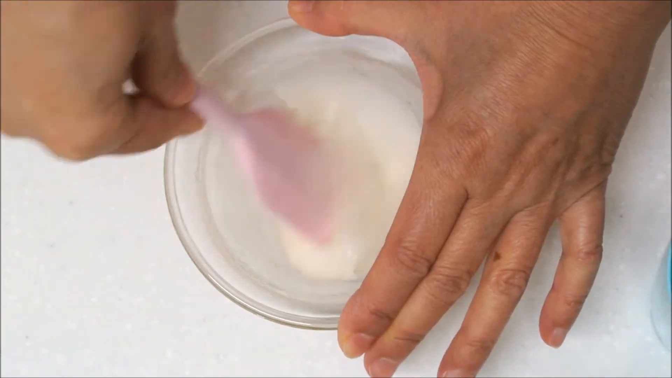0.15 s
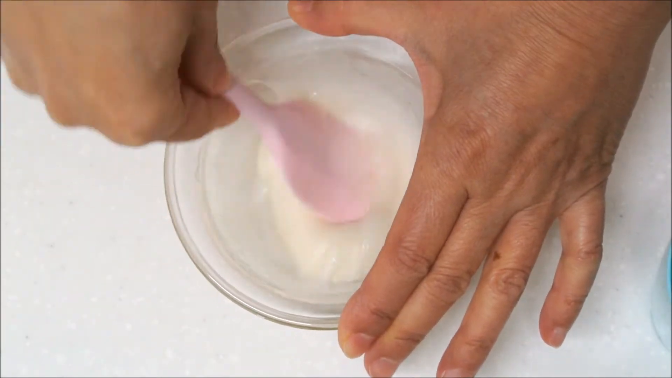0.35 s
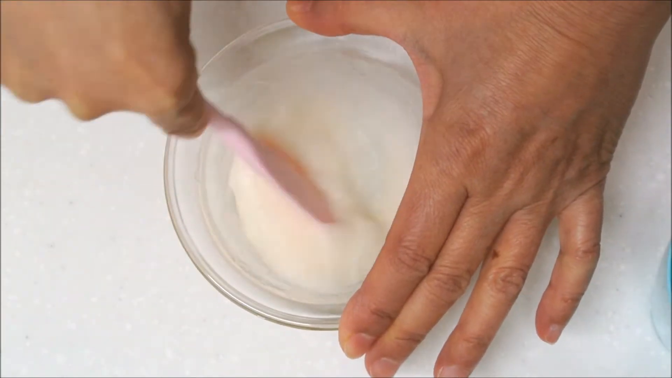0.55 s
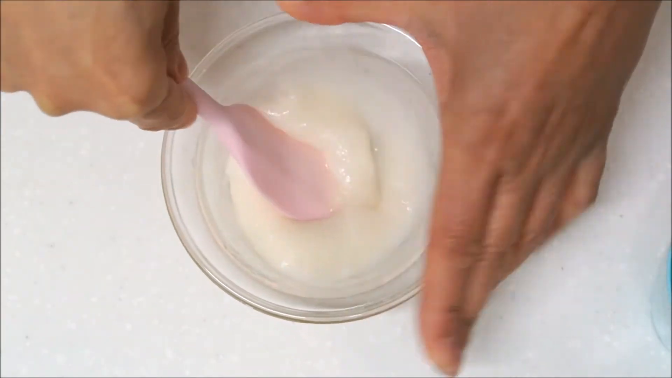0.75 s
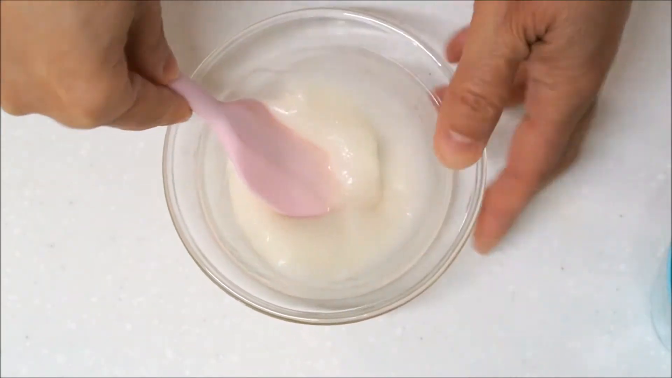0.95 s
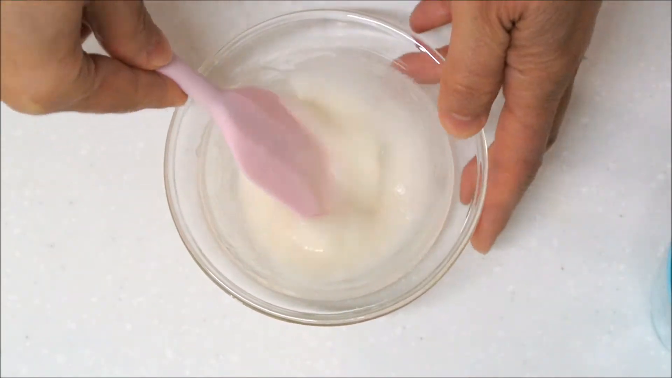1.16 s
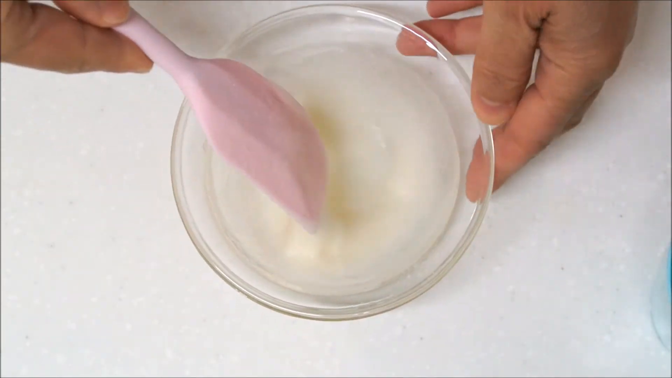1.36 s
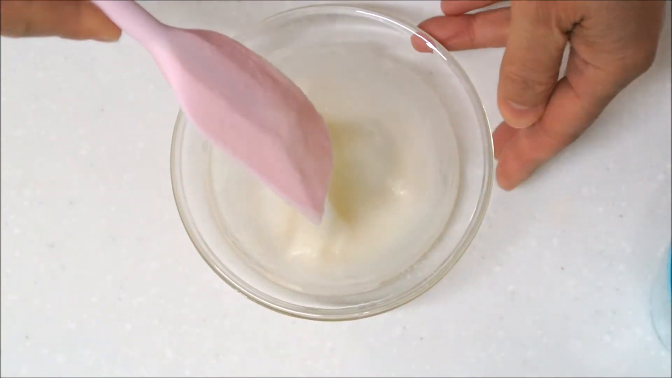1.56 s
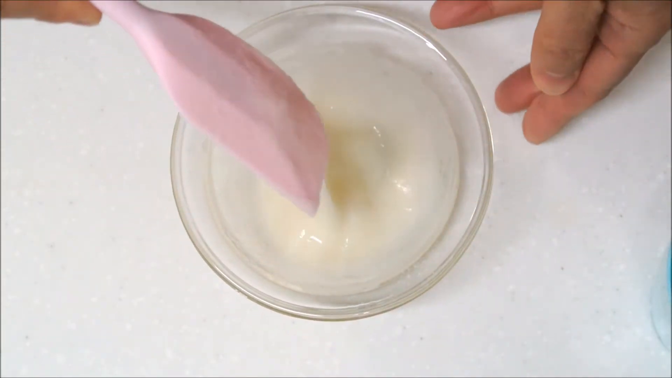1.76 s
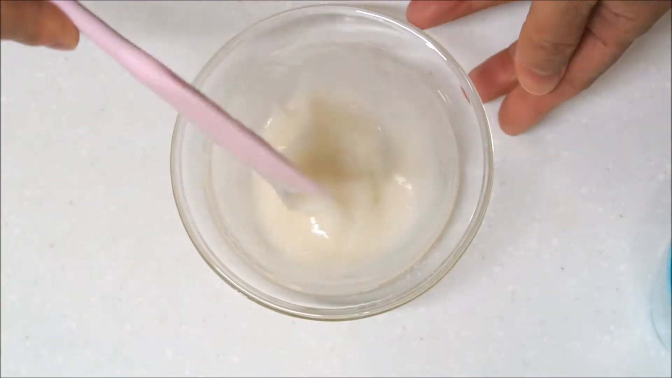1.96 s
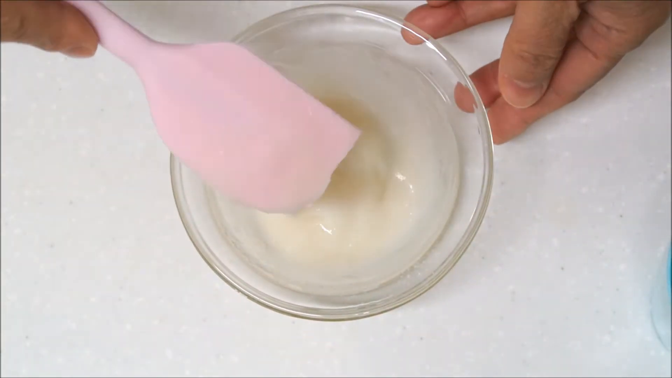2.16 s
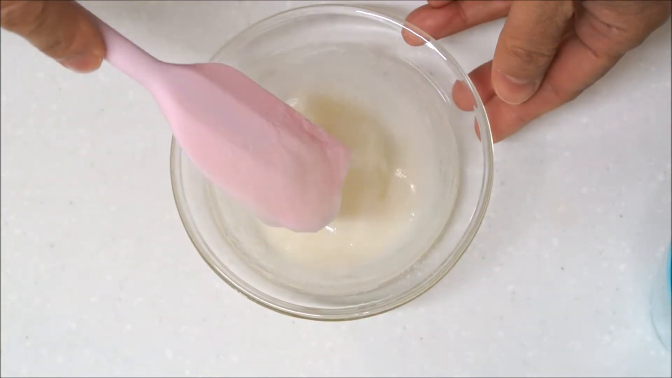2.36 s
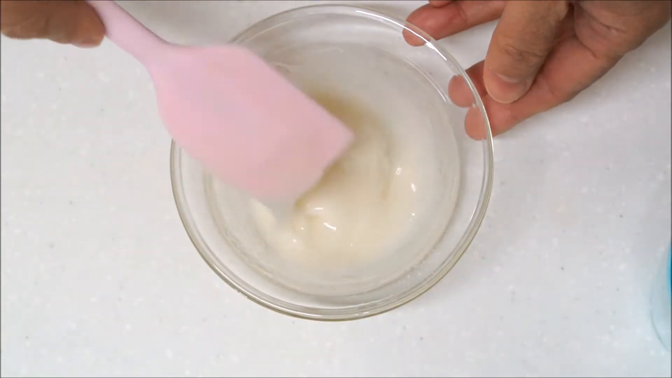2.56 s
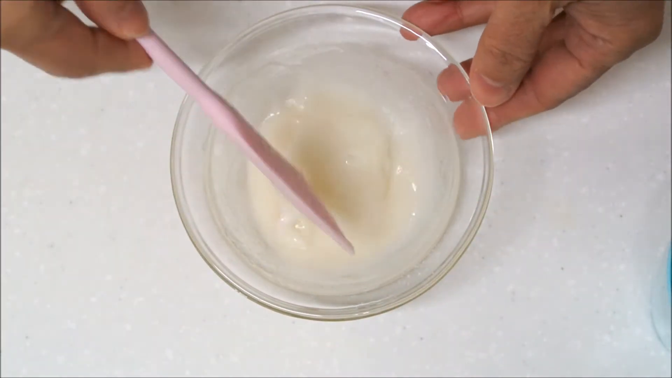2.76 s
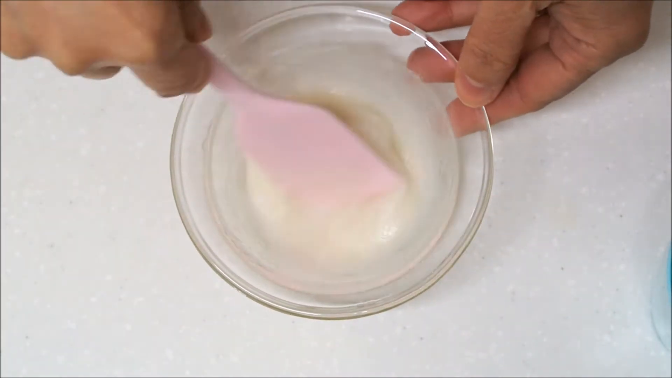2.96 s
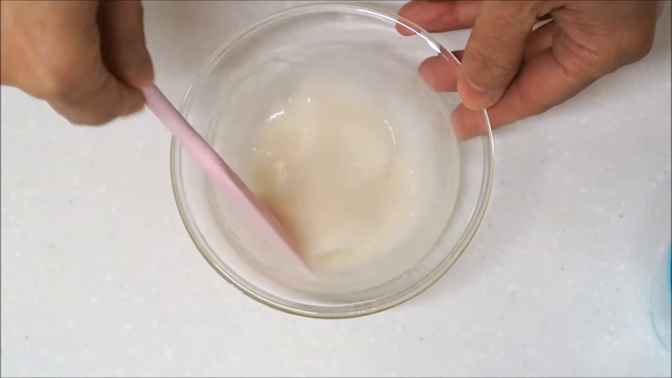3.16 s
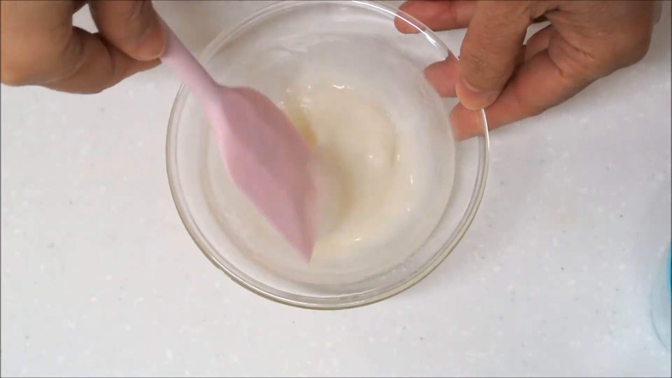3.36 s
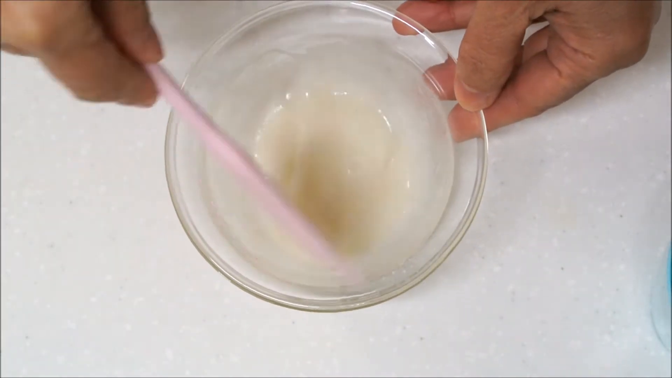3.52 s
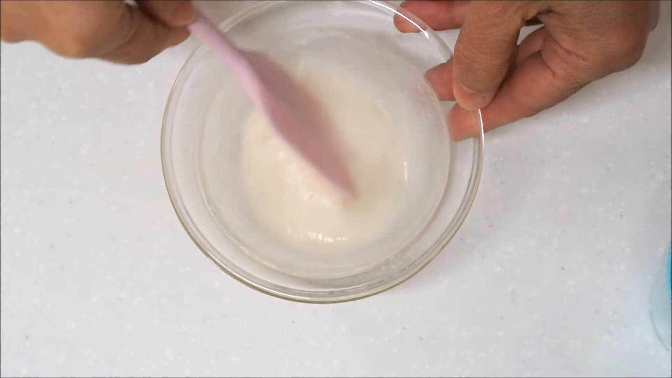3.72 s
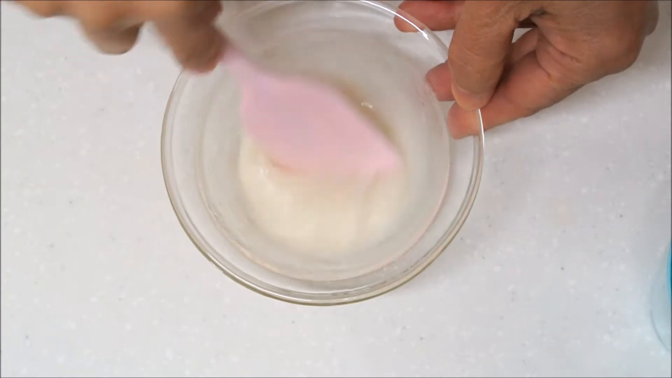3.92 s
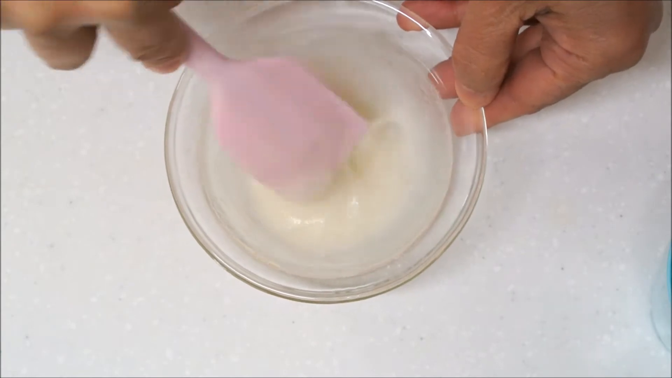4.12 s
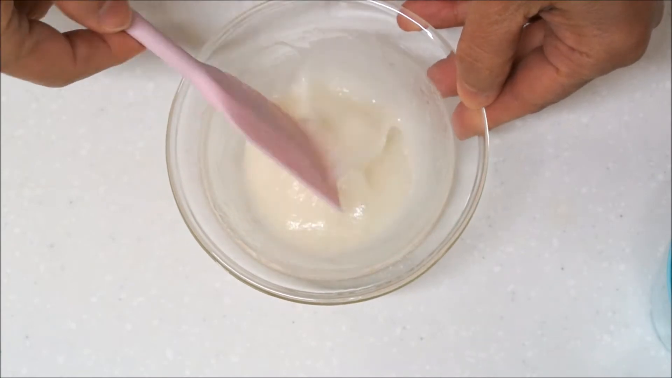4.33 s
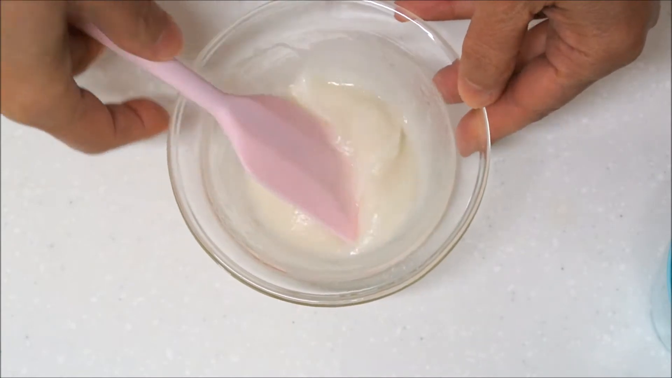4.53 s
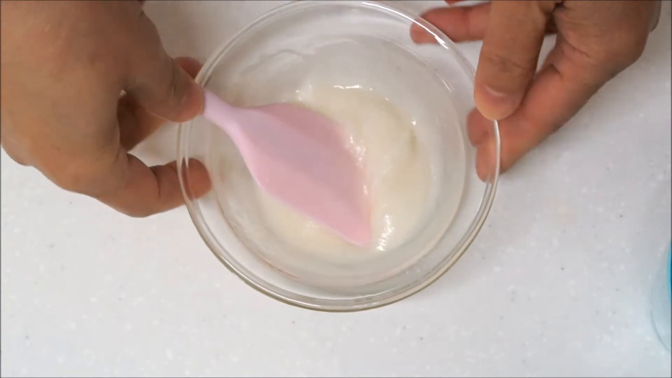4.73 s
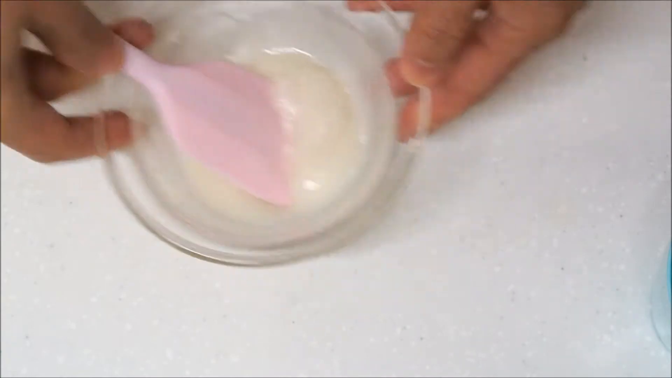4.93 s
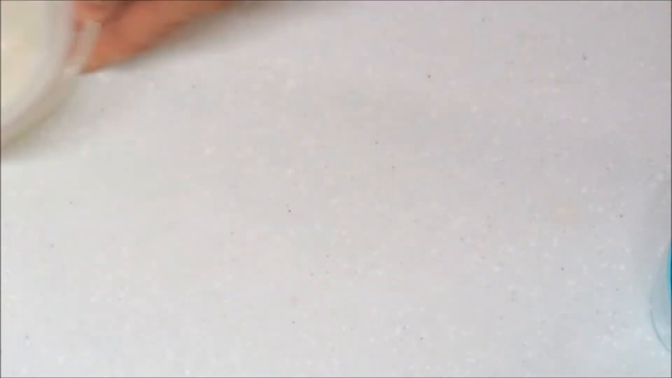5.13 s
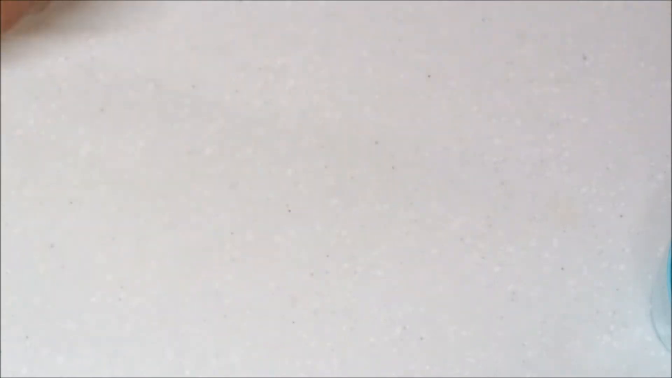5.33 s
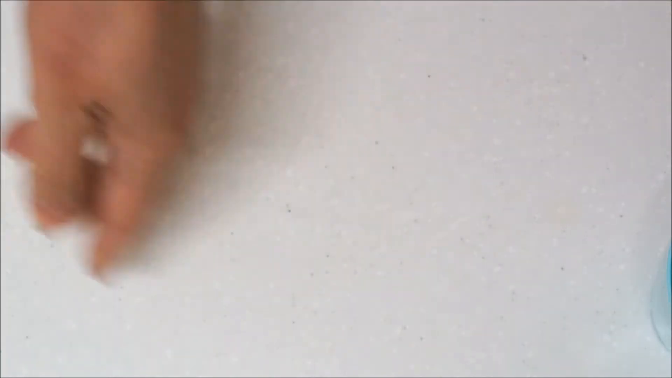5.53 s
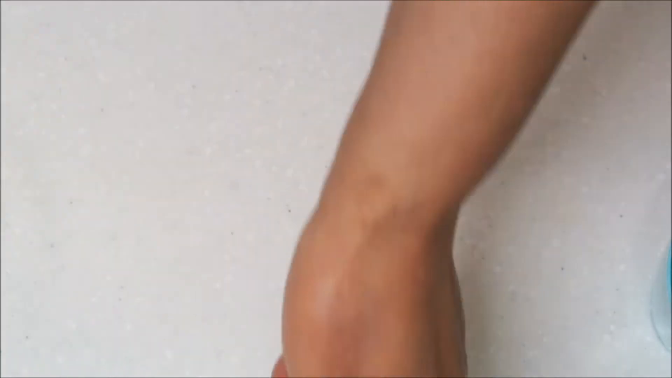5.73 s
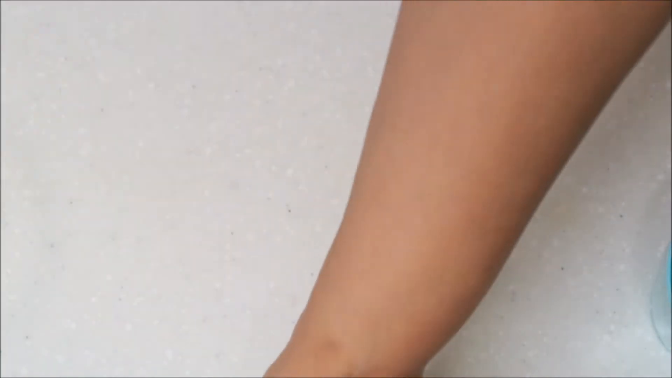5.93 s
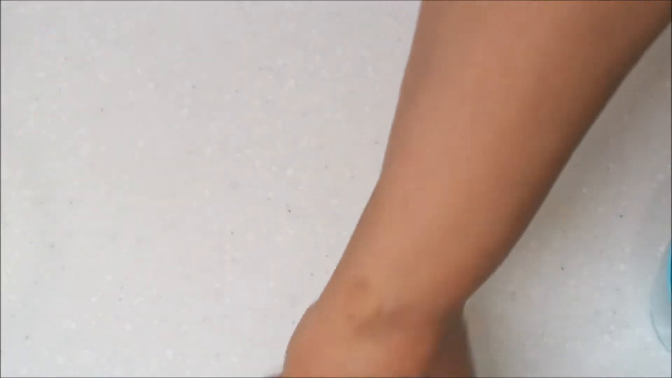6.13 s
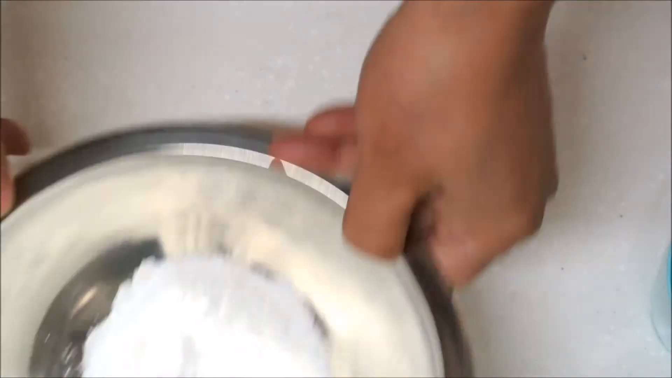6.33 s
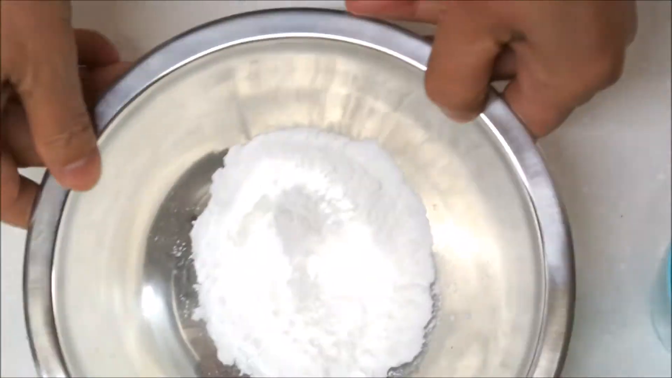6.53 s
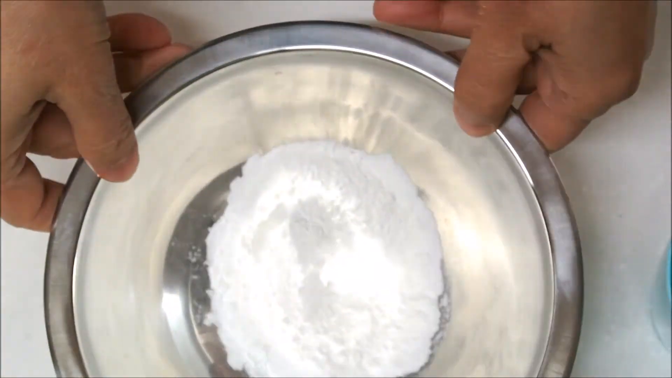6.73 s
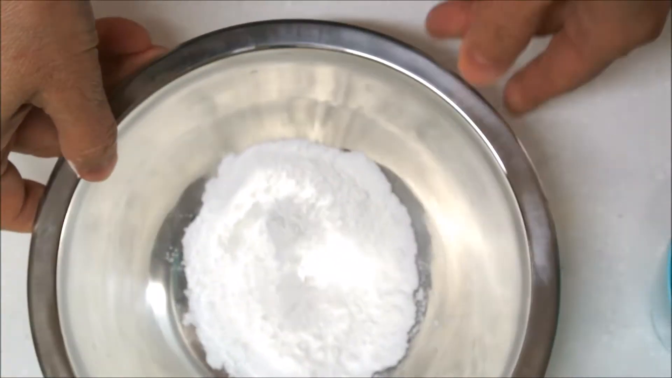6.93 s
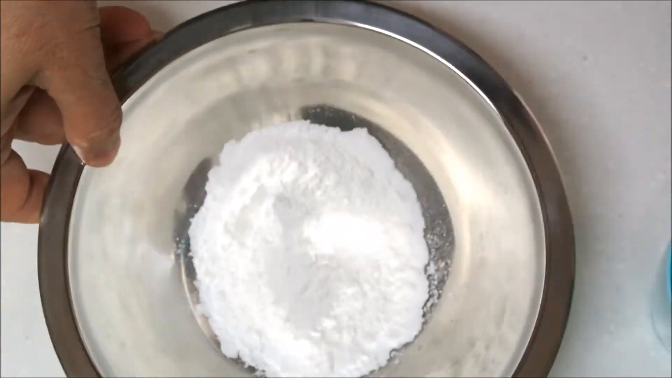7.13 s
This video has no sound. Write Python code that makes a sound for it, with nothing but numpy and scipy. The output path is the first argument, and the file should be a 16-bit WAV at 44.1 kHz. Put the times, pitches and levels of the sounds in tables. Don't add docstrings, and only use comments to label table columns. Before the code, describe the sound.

A close stereo pickup in a hard, echoing kitchen, with steady low fridge hum, soft hiss and thin rustling of hands throughout. From 0.4 to 0.75 s a soft blade wipes sticky paste in a glass bowl: bright crackling swipes, wet ticks, peels and a tiny glass ting. Dull bowl taps follow at 0.9 to 1.2 s, then it is mostly quiet, with faint ticks and a slight shift near 2.3 s. A small wet smack comes at 3.24 s, a clean damped double knock at 3.7 s, and soft bumps at 4.4 to 4.8 s. Glass grinds on stone from 5.0 s and lands at 5.27 s with by far the loudest crack, overloaded, room ringing, level briefly ducking. A light tap at 5.6 s; steel touches at 6.06 s, jerks harshly at 6.12 and 6.38 s with squeaks and rim ring, then clanks down at 6.94 s, bouncing.

```python
import sys
import numpy as np
from scipy import signal
from scipy.io import wavfile
from scipy.ndimage import uniform_filter1d, minimum_filter1d

SR = 44100
rng = np.random.default_rng(int(sys.argv[2]) if len(sys.argv) > 2 else 0)


def natural_amplitude(level_db):
    exponent = np.asarray(level_db, float) / 20
    return 10 ** exponent


def bounce(signal):
    frames = np.transpose(np.atleast_2d(signal))
    limited = np.clip(frames, -1, 1)
    pcm = np.round(limited * 32767).astype(np.int16)
    wavfile.write(sys.argv[1], SR, pcm)


N = 316638
PORT_LEAN = 10 ** (np.array([[-1.2], [1.2]]) / 20)


def in_time(rows):
    s, *columns = np.transpose(rows)
    return [np.interp(np.arange(N) / SR, s, c, left=-120, right=-120) for c in columns]


def at_hz(points, hz):
    table_hz, values = np.array(points).T
    return np.interp(np.log(hz), np.log(table_hz), values)


def rms_one(x):
    return x / np.sqrt(np.mean(x ** 2) + 1e-20)


def resonate(x, hz, width_hz):
    r = np.exp(-np.pi * width_hz / SR)
    gain = (1 - r * r) / 2
    return signal.lfilter([gain, 0, -gain], [1, -2 * r * np.cos(2 * np.pi * hz / SR), r * r], x)


def resonate_twice(x, hz, width_hz):
    return resonate(resonate(x, hz, width_hz), hz, width_hz)


# pitch_hz, likeness (-1 to 1)
LIKENESS = [(60, 0.57), (150, 0.87), (380, 0.85), (950, 0.59), (2380, 0.12), (5980, -0.091),
            (15000, -0.016)]
# pitch_hz, left_minus_right_db
LEAN = [(60, 1), (180, -2), (550, -2), (1650, -1.5), (4970, 0.5), (15000, -0.5)]


def stereo(pair, hz):
    alike = np.clip(at_hz(LIKENESS, hz), -1, 1)
    sides = np.array([[1], [-1]])
    mixed = np.sqrt(1 + alike) * pair[0] + np.sqrt(1 - alike) * pair[1] * sides
    return mixed * natural_amplitude(at_hz(LEAN, hz) / 2 * sides)


def bands(size):
    white = rng.standard_normal((2, 2, size))
    edges = 25 * 2 ** (np.arange(29) / 3)
    for k, (low, high) in enumerate(zip(edges, edges[1:])):
        hz = np.sqrt(low * high)
        band_pass = signal.butter(2, [low, high], "band", fs=SR, output="sos")
        yield hz, stereo(signal.sosfilt(band_pass, white[k % 2]), hz)


def grains(per_s, spread_db):
    sizes = natural_amplitude(spread_db * np.minimum(rng.exponential(1, N), 5)) * rng.choice([-1, 1], N)
    slips = rms_one(sizes * (rng.random(N) < per_s / SR))
    return slips + 0.99 * rng.standard_normal((2, N))


def body(drive, peaks):
    return rms_one(sum((-1) ** k * natural_amplitude(db) * resonate(drive, hz, width_hz)
                       for k, (hz, width_hz, db) in enumerate(peaks)))


def strokes(rows, rise_db_s, sag_db_s, fall_db_s):
    s, held, *columns = np.transpose(rows)
    since = np.arange(0, N, 16) / SR - s[:, None]
    released = np.maximum(since - held[:, None], 0)
    loss_db = np.where(since < 0, rise_db_s * since, -sag_db_s * since - fall_db_s * released)
    lead = np.argmax(columns[0][:, None] + loss_db, axis=0)
    lead_loss_db = loss_db[lead, np.arange(len(lead))]
    return np.repeat([lead_loss_db] + [c[lead] for c in columns], 16, axis=1)[:, :N]


def add(out, s, piece):
    at = round(s * SR)
    out[..., at:at + piece.shape[-1]] += piece[..., :N - at]


def puff(noise, hz, width_hz, t60):
    dying = noise * natural_amplitude(-60 * np.arange(noise.shape[-1]) / SR / t60)
    sound = resonate_twice(dying, hz, width_hz)
    return sound / np.max(np.abs(sound))


def puffs(rows, width_share):
    out = np.zeros((2, N))
    for s, db, hz, t60 in rows:
        add(out, s, natural_amplitude(db) * puff(rng.standard_normal((2, SR // 5)), hz, width_share * hz, t60))
    return out


# pitch_hz, level_db per Hz
ROOM_TONE = [(15, -48), (25, -28), (38, -11.5), (70, -14.5), (149, -12), (206, -13), (249, -6.5),
             (344, -10), (384, -6.5), (476, -9.5), (796, -11.5), (1480, -17.5), (3620, -22), (11300, -26),
             (16000, -28.5)]
# pitch_hz, width_hz, level_db rms
HUM = [(71.6, 2.7, -77), (104, 6.1, -76), (144.5, 4.3, -66.5), (247.2, 20, -57.5), (290.3, 11.4, -62.5),
       (393.2, 23, -63), (500, 5.4, -65.5), (793.4, 43, -62), (873.4, 19, -62.5)]
ROOM_TONE_DB, MOTOR_HZ, MOTOR_DB = -47, 48.7, -65


def room_tone():
    wash = rms_one(sum(natural_amplitude(at_hz(ROOM_TONE, hz)) * band for hz, band in bands(N)))
    motor = np.sqrt(2) * np.sin(2 * np.pi * MOTOR_HZ * np.arange(N) / SR)
    out = natural_amplitude(ROOM_TONE_DB - 1.44) * wash + natural_amplitude(MOTOR_DB) * motor
    for hz, width_hz, db in HUM:
        line = resonate_twice(rng.standard_normal((2, N + SR)), hz, width_hz)[:, SR:]
        out = out + natural_amplitude(db) * rms_one(stereo(line, hz))
    return out


# time_s, level_db
WHISPER = [(0.0, -51.5), (0.6, -54), (1.37, -51.5), (2.27, -57.5), (2.88, -53), (3.1, -59), (3.68, -58),
           (3.87, -54), (4.25, -53.5), (5.25, -52.5), (5.9, -49.5), (6.33, -47.5), (6.74, -51), (7.18, -49)]
WHISPER_FLICKER_DB, FLICKER_S = 4.0, .03


def whisper():
    slow = uniform_filter1d(rng.standard_normal(N), round(FLICKER_S * SR))
    flicker = rms_one(uniform_filter1d(slow, size=600))
    level_db = in_time(WHISPER)[0] - 5.0 + WHISPER_FLICKER_DB * np.tanh(flicker)
    return natural_amplitude(level_db) * body(rng.standard_normal((2, N)), [(9000, 17000, 0)])


# start_s, peak_db, pitch_hz, t60_s
PEELS = [(.13, -42, 1500, .15), (.135, -42, 4500, 0.14), (.364, -40, 7500, .08), (.384, -27, 13500, .01),
         (.416, -38, 13000, .03), (0.401, -30.5, 4000, 0.2), (0.628, -24.5, 7500, 0.057),
         (.646, -24, 7600, 0.059), (.646, -30, 10500, .05), (3.234, -34, 9000, 0.065),
         (3.238, -30, 13100, .03), (3.236, -51, 3440, .12), (3.7129, -29, 10000, 0.029),
         (3.996, -38, 4970, .012), (5.611, -29.5, 4100, 0.014), (5.678, -41, 4700, .02),
         (6.064, -37, 178, 0.38), (6.9353, -14, 9900, 0.026), (6.9352, -23, 6040, 0.034),
         (6.963, -26, 2700, 0.023), (6.963, -27, 10000, 0.082)]


def peels():
    return puffs(PEELS, width_share=0.39)


# start_s, peak_db, pitch_hz
THUDS = [(0.143, -52, 139), (0.388, -44.5, 99), (0.66, -49, 136), (1.032, -65, 72.7), (3.237, -49, 72.7),
         (3.711, -42, 74), (4.406, -48.5, 87.5), (4.773, -58, 108), (5.273, -41, 142), (6.063, -51, 102),
         (6.117, -47, 106), (6.935, -38, 99)]
THUD_T60_S = .12


def thuds():
    out, t = np.zeros((2, N)), np.arange(SR // 3) / SR
    fade = natural_amplitude(-60 * t / THUD_T60_S)
    for s, db, hz in THUDS:
        boom = np.sin(2 * np.pi * hz * t) + np.sin(2 * np.pi * 2.13 * hz * t) * fade
        add(out, s, natural_amplitude(db + 4.0) * fade * (1 - np.exp(-t / 0.00079)) * boom)
    return out * PORT_LEAN


# start_s, peak_db, pitch_hz, edge_db
BUMPS = [(0.387, -31.5, 1700, -51), (0.625, -31.5, 1420, -52), (0.918, -32, 800, -46),
         (1.093, -37, 850, -44), (1.194, -34, 805, -42), (3.236, -42, 503, -47), (4.407, -46, 1190, -53),
         (4.636, -33.5, 744, -37.5), (4.736, -34.5, 760, -46), (4.773, -29.5, 780, -36),
         (4.799, -33.5, 730, -56), (5.609, -33, 870, -44.5), (6.063, -36, 380, -44),
         (6.377, -32.5, 1100, -55)]
BUMP_T60_S, BUMP_WIDTH_SHARE = .065, 0.75
EDGE_HZ, EDGE_WIDTH_HZ, EDGE_T60_S = 1370, 700, .07


def bumps():
    out = np.zeros((2, N))
    for s, db, hz, edge_db in BUMPS:
        shared, own = rng.standard_normal(SR // 5), rng.standard_normal((2, SR // 5))
        shared[0] = 1.4
        edge = puff(shared + .5 * own, EDGE_HZ, EDGE_WIDTH_HZ, EDGE_T60_S)
        tap = puff(shared + 0.22 * own, hz, BUMP_WIDTH_SHARE * hz, BUMP_T60_S)
        add(out, s, natural_amplitude(db - 3.5) * tap + natural_amplitude(edge_db) * edge)
    return out * PORT_LEAN


# start_s, peak_db, pitch_hz, t60_s
KNOCKS = [(.388, -39, 3600, .015), (.388, -41, 1700, .02), (.5105, -36, 4000, .01), (.921, -41, 1500, .02),
          (.924, -37, 905, 0.046), (1.0925, -32, 1450, .025), (1.093, -39, 2500, .015),
          (1.094, -34, 880, .07), (1.195, -32, 850, .07), (1.196, -39, 1700, .05), (1.203, -40, 1250, .06),
          (3.715, -36, 2750, .02), (3.715, -39, 3650, .015), (3.716, -33, 780, .06),
          (6.059, -44, 3950, .07), (6.0642, -23, 600, .02), (6.068, -28.5, 239, 0.054),
          (6.0764, -27, 420, .022), (6.0875, -36, 2100, .015), (6.0875, -38, 3670, .012),
          (6.1, -42, 2100, .01), (6.378, -38, 1247, .06), (6.113, -40, 1150, .05), (6.122, -39, 1500, .07),
          (6.137, -37, 1500, 0.065), (6.128, -40, 3700, .015), (6.145, -41, 3900, .015)]


def knocks():
    out, t = np.zeros((2, N)), np.arange(SR // 3) / SR
    for s, db, hz, t60 in KNOCKS:
        add(out, s, natural_amplitude(db - 60 * t / t60) * (1 - np.exp(-t / 0.00045)) * np.sin(2 * np.pi * hz * t))
    return out * PORT_LEAN


# full_pressure_s, held_s, level_db, film_pitch_hz
WIPES = [(.388, 0.005, -39, 5500), (.397, .008, -42, 5500), (.412, .02, -40, 4200), (.436, .02, -46, 3800),
         (.46, .045, -50, 5000), (.511, .004, -47, 7500), (.63, .015, -37, 7400), (.646, 0.022, -36, 8200),
         (.712, 0.0054, -45, 7900), (.73, 0.036, -49, 6500), (3.255, .025, -49, 9800),
         (3.29, 0.046, -52, 6700)]


def wipes():
    drive = grains(per_s=8000, spread_db=5.5)
    loss_db, db, pitch_hz = strokes(WIPES, rise_db_s=1500, sag_db_s=120, fall_db_s=800)
    out = np.zeros((2, N))
    for hz, lift_db in [(1700, 2), (3600, 1.5), (4500, -0.5), (7300, -2), (9500, 2.5), (11500, -3), (14000, -11)]:
        octaves = np.abs(np.log2(np.maximum(pitch_hz, 100) / hz))
        band = rms_one(resonate_twice(drive, hz, .3 * hz))
        out = out + natural_amplitude(db + loss_db + lift_db - 7.0 - 4.6 * octaves) * band
    return out


# start_s, peak_db, pitch_hz, t60_s
TINGS = [
    (.41, -41, 1666, 0.1),
    (3.24, -48, 1800, .3),
    (.389, -32.5, 7260, 0.087),
    (6.118, -44, 3600, 0.06),
    (6.062, -28, 9230, 0.038),
    (6.092, -30, 10000, 0.036),
    (6.378, -27, 7400, 0.12),
    (6.379, -32, 9200, 0.13),
    (6.852, -41, 7320, 0.13),
]


def tings():
    return puffs(TINGS, width_share=0.075)


# start_s, peak_db, pitch_hz, left_minus_right_db
SMACKS = [(0.4893, -34, 8240, 0.0), (0.5105, -30, 10100, -1.0), (0.567, -37, 8050, 4),
          (0.674, -24, 9150, 1.5), (0.6784, -33, 9650, -2), (0.7113, -28.5, 9400, -1),
          (0.7344, -41, 8660, 0.0), (1.1396, -33, 4960, -4), (1.6192, -35, 11300, -0.5),
          (2.5814, -37, 4940, 0), (3.2464, -29.5, 9330, 0), (3.9809, -37, 11000, -12),
          (3.9961, -27, 10600, 1), (6.065, -31, 9330, 6), (6.0876, -33, 9820, 5), (6.852, -34, 13500, -2)]
SMACK_T60_S, SMACK_WIDTH_SHARE = 0.01, 0.9


def smacks():
    out = np.zeros((2, N))
    for s, db, hz, pan_db in SMACKS:
        noise = rng.standard_normal(SR // 10) + 0.77 * rng.standard_normal((2, SR // 10))
        noise[:, 0] = 2.9
        gain = natural_amplitude(db + pan_db / 2 * np.array([[1], [-1]]))
        add(out, s, gain * puff(noise, hz, SMACK_WIDTH_SHARE * hz, SMACK_T60_S))
    return out


def grind(drive, modes, level_db, pitch_hz, loss_db_octave):
    return sum(natural_amplitude(level_db + mode_db - loss_db_octave * np.abs(np.log2(pitch_hz / hz)))
               * body(drive, [(hz, width_hz, 0)]) for hz, width_hz, mode_db in modes)


# full_pressure_s, held_s, level_db, pitch_hz
GLASS_SLIDE = [
    (2.3, 0.15, -61, 2400),
    (4.02, 0.038, -59, 2400),
    (5.01, .04, -58, 2150),
    (5.085, .045, -52.5, 2400),
    (5.165, .03, -48.5, 2600),
    (5.205, .02, -50, 2250),
    (5.25, .05, -50, 3000),
]
# pitch_hz, width_hz, level_db
GLASS = [(1600, 400, 0), (2190, 250, 2.5), (2500, 200, 1), (2760, 200, -2), (3650, 250, 4.5),
         (4600, 840, -1)]


def glass_slide():
    loss_db, db, pitch_hz = strokes(GLASS_SLIDE, rise_db_s=125, sag_db_s=3, fall_db_s=300)
    return grind(grains(per_s=4000, spread_db=1.5), GLASS, db + loss_db - 5.0, pitch_hz, 14)


# pitch_hz, t60_s
KITCHEN_T60 = [(60, 0.39), (250, 0.47), (1000, 0.63), (3000, 0.59), (7000, 0.37), (15000, 0.29)]


def kitchen(x, colour):
    t = np.arange(SR * 2 // 3) / SR
    tail = sum(band * natural_amplitude(at_hz(colour, hz) - 60 * t / at_hz(KITCHEN_T60, hz)) for hz, band in bands(len(t)))
    tail = tail / np.std(tail[:, :SR // 20]) * (1 - np.exp(-t / 0.00048))
    return signal.fftconvolve(x[None], tail, axes=1)[:, :N]


# delay_s, level_db
SLAPS = [(.056, -23), (.071, -21), (.083, -23), (.097, -22), (.108, -24.5), (.122, -23.5), (.158, -26),
         (.182, -30)]


def wall_slaps(out, slap_db):
    mids = signal.butter(2, [400, 3500], "band", fs=SR, output="sos")
    back = signal.sosfilt(mids, out + 1e-18)
    for k, (delay_s, db) in enumerate(SLAPS):
        add(out, delay_s, natural_amplitude(db + slap_db) * back[::(-1) ** k])


BOUNCE_DULL_DB = 9


def set_down(blows, modes, echo_colour, scatter_db, crack_db, slap_db):
    out, pushes, t = np.zeros((2, N)), np.zeros(N), np.arange(SR // 2) / SR
    for s, db, contact_s, echo_db in blows:
        is_bounce = s > blows[0][0] + .02
        rings = 0
        for hz, mode_db, t60 in modes:
            dull_db = BOUNCE_DULL_DB * max(np.log2(hz / 2000), 0) * is_bounce
            strength = natural_amplitude(mode_db - dull_db + scatter_db * rng.standard_normal((2, 1)))
            late = min((hz / 1900) ** 2, 1.5) * rng.standard_normal((2, 1))
            rings = rings - strength * np.sin(2 * np.pi * hz * t + late) * natural_amplitude(-60 * t / t60)
        crack = natural_amplitude(crack_db) * puff(rng.standard_normal((2, len(t))), 4900, 8600, 0.0043)
        onset = 1 - np.exp(-(t / contact_s) ** 2)
        add(out, s, natural_amplitude(db) * (onset * rings + crack) * PORT_LEAN)
        pushes[round(s * SR)] = natural_amplitude(echo_db)
    wall_slaps(out, slap_db)
    return out + kitchen(pushes, echo_colour)


# start_s, blow_db, contact_s, echo_db
BLADE_DOWN = [
    (3.7146, -24, 0.00038, -41),
    (3.7195, -29.5, 0.00038, -64),
]
# pitch_hz, level_db, t60_s
BLADE_ON_GLASS = [(204, -12.5, 0.095), (310, -4, 0.036), (500, -3.5, 0.037), (647, -11, 0.038),
                  (952, -2, 0.068), (1150, 0, 0.019), (1500, -1, 0.019), (1930, -2, 0.02),
                  (2400, -10, 0.018), (3160, -2, 0.011), (4130, -10, 0.016)]
# pitch_hz, level_db per Hz
BLADE_ECHO = [(35, -36), (60, -4), (295, -2), (591, -1), (895, -4), (1180, -8), (1830, -9), (3270, -16.5),
              (15000, -27)]


def blade_down():
    return set_down(BLADE_DOWN, BLADE_ON_GLASS, BLADE_ECHO, scatter_db=1.5, crack_db=-6, slap_db=-1.5)


# start_s, blow_db, contact_s, echo_db
GLASS_DOWN = [
    (5.27325, 0.5, 0.00025, -14.5),
    (5.2749, -1.5, 0.00036, -46),
    (5.2786, -11.5, 0.00029, -43),
    (5.282, -28, 0.00023, -32),
]
# pitch_hz, level_db, t60_s
GLASS_ON_STONE = [(1990, -8.5, 0.03), (322, -43, 0.034), (482, -8.5, 0.026), (870, -3.5, 0.02),
                  (1397, -4.5, 0.037), (1404, 3.5, 0.0056), (1727, 3.5, 0.013), (2150, -1, 0.019),
                  (2700, -5, 0.022), (3130, -4, 0.015), (4480, -3, 0.0057), (5470, -23, 0.0038),
                  (6500, -9.5, 0.018), (8700, -31, 0.0071), (11000, -16, 0.01), (14300, -34, .01)]
# pitch_hz, level_db per Hz
GLASS_ECHO = [(35, -49), (60, -12), (95, -14), (129, -34), (251, -4.5), (317, -12), (591, -6.5), (633, -14),
              (835, -4), (1150, -7.5), (1920, -6), (2060, -3.5), (3190, -11), (15000, -35)]


def glass_down():
    return set_down(GLASS_DOWN, GLASS_ON_STONE, GLASS_ECHO, scatter_db=-1.0, crack_db=-0.5, slap_db=0.5)


# full_pressure_s, held_s, rim_db, rim_pitch_hz, belly_db
STEEL_DRAG = [
    (6.056, .045, -49.5, 9400, -60),
    (6.118, 0.026, -38, 10100, -42),
    (6.382, 0.045, -42, 7840, -48),
    (6.45, 0.14, -50.5, 8400, -63),
    (6.69, 0.13, -65, 9200, -65),
    (6.866, 0.011, -51, 7460, -61),
]
# pitch_hz, width_hz, level_db
STEEL_RIM = [(5760, 340, -1), (7500, 430, 4.5), (8530, 360, 2.5), (9380, 220, 3), (10000, 350, 2.5),
             (10800, 300, -1), (11800, 200, -2), (12600, 500, -5), (13600, 500, -3), (15000, 460, -15)]
# pitch_hz, width_hz, level_db
STEEL_BELLY = [(1080, 130, 9.5), (1500, 340, 7.5)]
# full_pressure_s, held_s, level_db
SQUEAKS = [
    (6.054, .005, -54),
    (6.13, .02, -49.5),
    (6.31, 0.16, -55.5),
    (6.67, .04, -59.5),
    (6.806, 0.014, -58),
]
# pitch_hz, width_hz, level_db
STEEL_SQUEAK = [(2446, 66, 5), (2717, 77, 7)]
STEEL_ENTERS_S, BELLY_SWING = 5.9, 1.5


def steel_drag():
    late = round(STEEL_ENTERS_S * SR)
    drive = grains(per_s=4000, spread_db=1.5)[:, late:]
    drag = strokes(STEEL_DRAG, rise_db_s=603, sag_db_s=28, fall_db_s=300)
    loss_db, rim_db, pitch_hz, belly_db = drag[:, late:]
    squeak_db = sum(strokes(SQUEAKS, rise_db_s=497, sag_db_s=3, fall_db_s=400))[late:]
    belly = natural_amplitude(belly_db + BELLY_SWING * loss_db) * body(drive, STEEL_BELLY)
    squeak = natural_amplitude(squeak_db) * body(body(drive, STEEL_SQUEAK), STEEL_SQUEAK)
    rim = grind(drive, STEEL_RIM, rim_db + loss_db - 7.5, pitch_hz, 22)
    out = np.zeros((2, N))
    out[:, late:] = belly + squeak + rim
    return out


# start_s, blow_db, contact_s, echo_db
STEEL_DOWN = [
    (6.9351, -9.5, 0.00059, -30.5),
    (6.9635, -19.5, 0.00035, -42),
    (6.975, -27, 0.00043, -51),
]
# pitch_hz, level_db, t60_s
STEEL_ON_STONE = [(183.6, -28, 0.4), (380, -16, 0.18), (540, 0.5, 0.015), (645, -18.5, 0.25),
                  (744, 11.5, 0.007), (787, -15, 0.12), (960, -19, 0.21), (1372, -11.5, 0.1),
                  (1349, -23, 0.3), (1580, -30, 0.092), (2300, -15, 0.046), (2760, -16, 0.02),
                  (4200, -10, 0.012), (3450, -23.5, 0.011)]
# pitch_hz, level_db per Hz
STEEL_ECHO = [(35, -50), (60, -22), (112, -31), (178, -7), (209, -20), (246, 3), (381, -14), (458, -6),
              (491, -7.5), (780, -6.5), (1100, -24), (1390, -16), (2010, -25.5), (15000, -38)]


def steel_down():
    return set_down(STEEL_DOWN, STEEL_ON_STONE, STEEL_ECHO, scatter_db=2.2, crack_db=-10, slap_db=-8)


def scene():
    small = thuds() + bumps() + knocks()
    rubs = whisper() + peels() + wipes() + tings() + smacks() + glass_slide() + steel_drag()
    blows = blade_down() + glass_down() + steel_down()
    rung = natural_amplitude(-40.0) * small + natural_amplitude(-42.5) * rubs
    echo = kitchen(rung.mean(axis=0), [(60, 0.015), (15000, 0)])
    return room_tone() + small + rubs + blows + echo


def band_limit(x):
    return signal.sosfilt(signal.butter(12, 15850, fs=SR, output="sos"), x)


def record(dry):
    t = np.arange(N) / SR
    dry = signal.sosfilt(signal.butter(2, 42, "high", fs=SR, output="sos"), dry)
    over_db = np.maximum(20 * np.log10(np.max(np.abs(dry), axis=0) + 1e-9) + 11, 0)
    held_db = np.maximum.accumulate(0.52 * over_db + 110 * t) - 110 * t
    lag = np.exp(-1 / (0.024 * SR))
    turned = dry * natural_amplitude(-signal.lfilter([1 - lag], [1, -lag], held_db))
    jump = np.diff(held_db, prepend=0) > 0
    coming_db = -minimum_filter1d(-over_db * jump, size=SR // 140)
    ahead_db = np.roll(coming_db, -SR // 120) * (held_db < .1)
    turned = turned * natural_amplitude(-1.3 * uniform_filter1d(ahead_db, size=40))
    treble_cut = signal.cheby2(14, 45, 16180, fs=SR, output="sos")
    mix = signal.sosfilt(treble_cut, np.clip(turned, -.95, .95))
    return band_limit(mix)


dry = scene()
out = record(dry)
bounce(out)
```